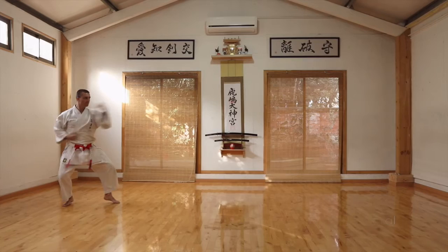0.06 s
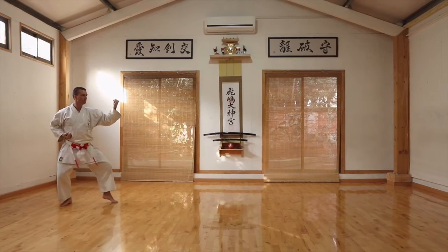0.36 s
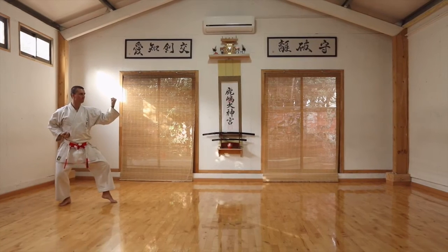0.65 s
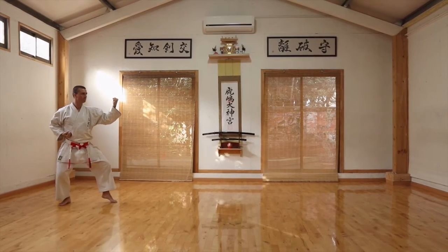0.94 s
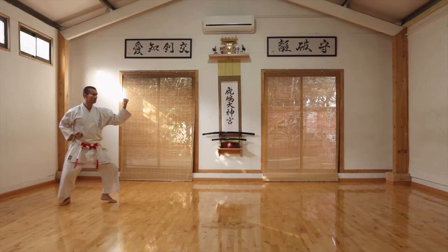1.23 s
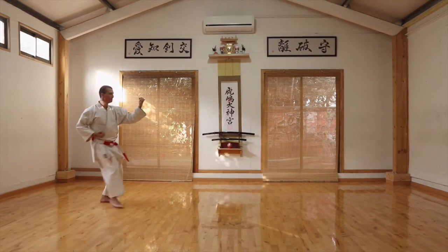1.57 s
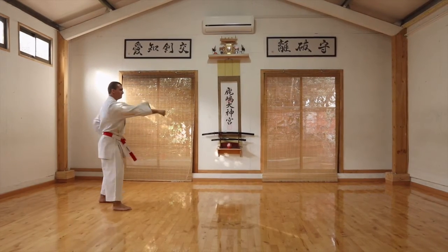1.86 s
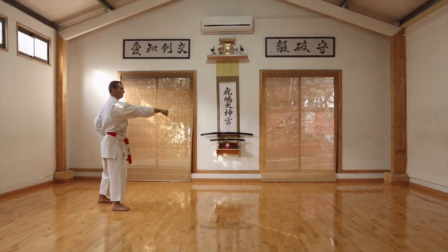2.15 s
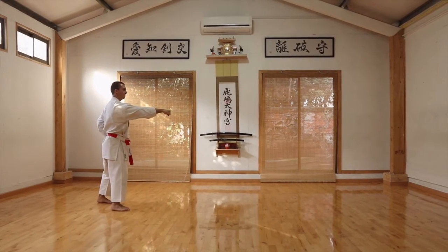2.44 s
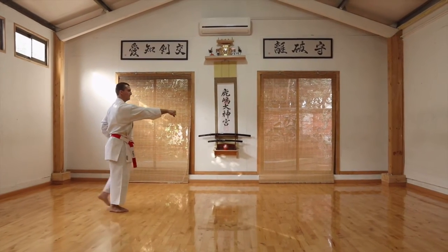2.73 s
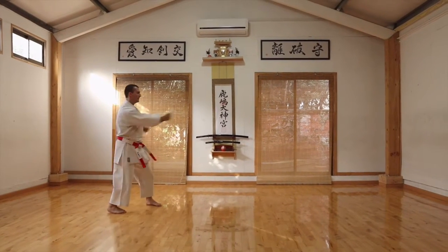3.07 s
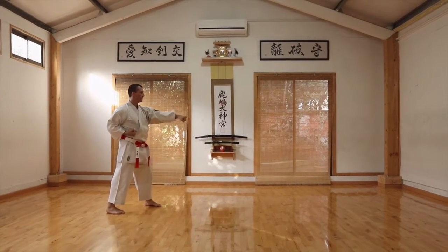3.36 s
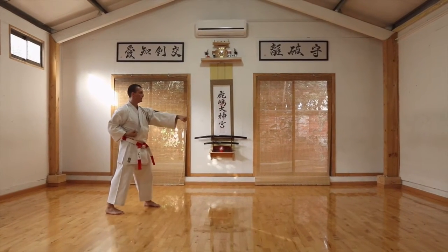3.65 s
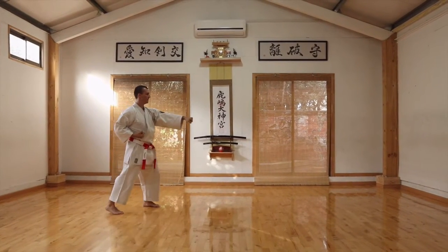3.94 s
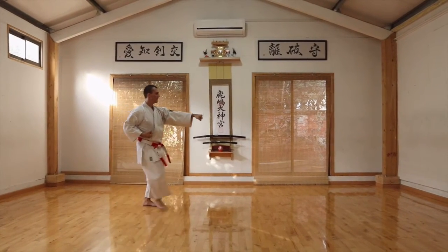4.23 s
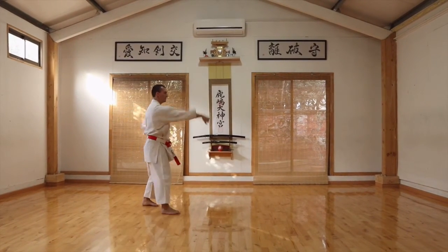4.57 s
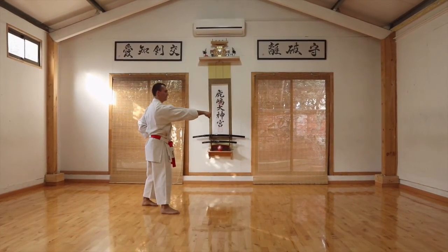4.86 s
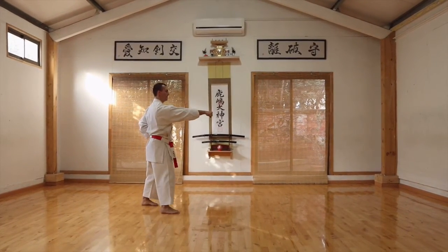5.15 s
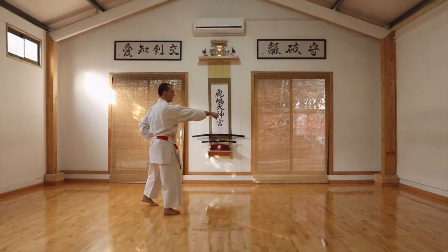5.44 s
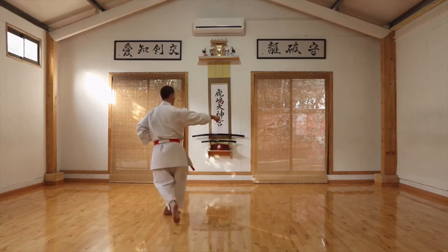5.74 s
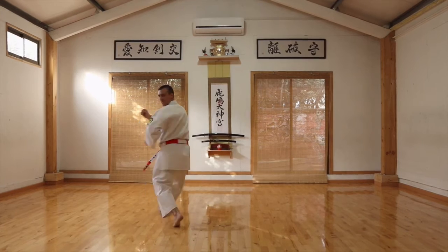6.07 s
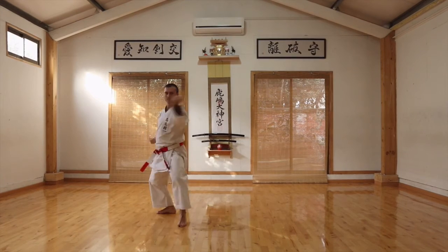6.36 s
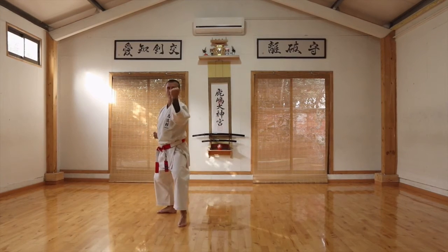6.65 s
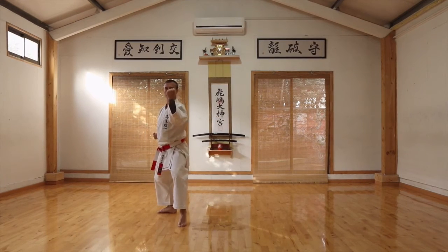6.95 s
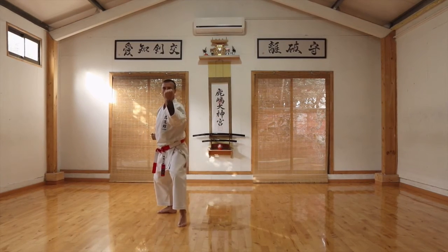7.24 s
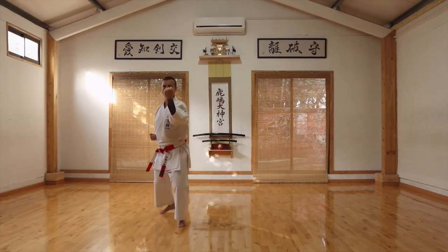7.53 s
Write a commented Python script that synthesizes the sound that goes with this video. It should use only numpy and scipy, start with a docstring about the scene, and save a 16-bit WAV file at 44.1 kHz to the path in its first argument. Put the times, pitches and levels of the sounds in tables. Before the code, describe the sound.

A barefoot karate practice is heard from a few metres away in an empty wooden hall, which rings for about a second over low room noise. It opens with a cotton rustle, faint squeaks and a cloth snap at 0.1 seconds. At 1.3 seconds a loud stamp booms in the sprung floor, followed by rustling and a sharp swish and crack of the heavy suit at 1.9. After a pause, fabric slides and soles chirp on the varnish from 2.6, leading to another crack at 3.2. More rustling and small squeaks from 4.0 end in a slightly softer snap at 4.6. Between 5.1 and 6.3 come light steps, short chirps and shifting cloth, then a strong crack at 6.4. The room is almost still until 7.5 seconds, when a second loud stamp lands with a squeak, a slap and a rustle.

```python
"""Empty wooden hall: a karateka runs through a form, barefoot, a few metres away.
His heavy cotton suit rustles as cloth slides over cloth and cracks taut at the end of each strike.
His soles stick and slip on the varnish in short chirps; two stamps boom in the sprung floor.
The hall rings for over a second above a low room noise."""
import sys
import numpy as np
from scipy import signal
from scipy.fft import rfft, irfft
from scipy.io import wavfile
from scipy.ndimage import uniform_filter1d

SR = 44100
rng = np.random.default_rng(int(sys.argv[2]) if len(sys.argv) > 2 else 0)


def dump_mix(stems):
    """Bounce the given channels to the path in sys.argv[1] as a 16-bit WAV at rate SR."""
    frames = np.atleast_2d(stems).T  # one column per channel
    limited = np.clip(frames, -1, 1)  # hard clip at full scale
    pcm = np.round(limited * 32767).astype(np.int16)
    wavfile.write(sys.argv[1], SR, pcm)


N = 335160
T = np.arange(N) / SR

# Levels are relative, ahead of the mix gains.
# spectral shapes of room noise, reflections, sole slap, sliding cloth, taut cloth: f/Hz, level/dB
ROOM_SPECTRUM = [(25, 9.5), (50, -5), (85, 2.5), (300, 2.5), (650, -9.5), (900, -8), (1900, -21.5),
                 (3300, -24.5), (5000, -28), (8000, -30), (15500, -31)]
HALL_SPECTRUM = [(60, -20.5), (150, -3.5), (450, 0.5), (1200, -5), (3500, -2), (8000, -3), (15000, -4)]
SLAP_SPECTRUM = [(60, -23), (450, -2), (900, 4), (1400, 7), (1800, -1.5), (3500, -5.5), (5000, -13.5),
                 (8000, -27), (15500, -34)]
RUSTLE_SPECTRUM = [(40, -26), (100, 6), (300, 7), (550, 0.5), (1000, 4.5), (2000, -2.5), (3500, -2.5),
                   (5000, -13), (8000, -20), (15500, -35.5)]
SNAP_SPECTRUM = [(40, -26), (100, -15.5), (200, -5), (400, -1), (620, -1), (900, -2), (1400, -0.5),
                 (2200, -14), (3400, -11.5), (5000, -21), (8000, -29), (15500, -41.5)]
# reverberation time: f/Hz, T60/s
HALL_DECAY = [(80, 0.71), (200, 0.93), (550, 1.27), (1400, 1.095), (3500, 0.83), (7000, 0.92),
              (14000, 0.28)]
# far-wall echoes: delay/s, level/dB
FAR_ECHOES = [(0.081, -16.5), (0.117, -21), (0.168, -11), (0.302, -24)]
# sprung-floor modes at pitch factor 1: f/Hz, level/dB, T60/s
FLOOR_MODES = [(65.8, -18, 0.99), (85.7, -9.5, 0.32), (125.4, -8.5, 0.56), (139.2, 2.5, 0.19),
               (191.2, -11, 0.61), (242.3, -14.5, 0.22), (289, -16.5, 0.15)]
# feet landing: t/s, thud/dB, slap/dB, pitch factor of the spot, hardness/(dB/oct)
LANDINGS = [(0.001, -28.5, -27.5, .8, 8), (1.329, -4, -15, 1.02, -1), (1.3452, -10.5, -38, 0.97, 3.5),
            (2.903, -32.5, -46, 1.53, 15), (3.091, -33, -34, 1.2, 0), (4.111, -33, -58, 0.88, 15.5),
            (5.119, -34, -26, 0.95, 7), (5.595, -30, -45, 1.05, 8), (5.818, -27, -41, 0.9, 2),
            (6.126, -33, -34.5, 1.36, 4), (6.285, -24, -29, 1.23, -5), (7.5184, -6.5, -14.5, .93, -3)]
# soles skidding: t/s, start f/Hz, length/s, level/dB
SOLE_SKIDS = [(0.039, 3245, 0.042, -27.5), (.068, 3650, .03, -32), (1.3266, 1260, 0.0092, -12.5),
              (2.681, 1430, .014, -26.5), (2.935, 1120, 0.0089, -23.5), (3.0636, 1375, 0.012, -15.5),
              (3.0774, 2190, 0.0051, -12.5), (3.083, 3500, 0.0058, -26), (4.404, 1151, 0.035, -24),
              (4.485, 1400, 0.0089, -23), (4.499, 2520, 0.0049, -19.5), (5.102, 1210, 0.0118, -26.5),
              (5.52, 1370, 0.0048, -26.5), (5.7457, 1316, 0.0079, -15.5), (5.898, 1120, 0.007, -25),
              (6.207, 1250, 0.006, -25), (7.001, 1290, 0.0057, -39), (7.009, 2220, 0.0096, -44),
              (7.307, 1200, 0.0404, -37.5), (7.513, 1165, 0.011, -9.5)]
# moves dragging cloth over cloth: t/s, length/s, level/dB, tilt/(dB/oct)
BODY_MOVES = [(0.0, 0.12, -28, 1.25), (.929, 0.027, -43.5, -1.2), (1.38, 0.12, -25, -1.3),
              (1.548, 0.023, -33, 3), (1.727, 0.065, -29, -0.3), (2.638, 0.03, -39.5, -2),
              (2.667, 0.087, -26.5, 1), (2.918, 0.06, -33, -1), (3.052, 0.07, -25, 0),
              (3.873, 0.096, -43.5, -1.5), (4.033, 0.053, -29, 0.1), (4.382, .16, -25.5, 0.4),
              (5.083, 0.093, -46.5, 4.5), (5.503, 0.078, -29, -.5), (5.719, 0.074, -27, 0),
              (5.862, 0.078, -31, 2.5), (5.97, 0.052, -41.5, 0), (6.192, 0.056, -31, -1),
              (6.264, 0.14, -28, 0), (6.99, 0.067, -50, 0.5), (7.278, 0.081, -40.5, -3.5),
              (7.4, 0.17, -49.5, 1), (7.519, 0.042, -20, -0.2)]
# folds pulled tight: t/s, level/dB, tilt/(dB/oct)
FOLD_TUGS = [(1.3247, -26.5, 7), (1.347, -20, 1), (1.553, -18.5, 0.5), (1.871, -11.5, -2), (2.95, -18, 0.5),
             (3.213, -18, -6), (3.914, -38.5, 6.5), (4.04, -23, -8.5), (5.523, -39, 11), (5.593, -29, -5),
             (6.337, -20, -5), (7.513, -23, 3.5), (7.53, -18, 0)]
# limb locking: t/s, swish/dB, crack/dB, crack f/Hz, hem/dB, flap/dB, flap f/Hz, flap decay/s
LIMB_STRIKES = [(0.0997, -39, -15.5, 825, -20, -22, 410, 0.046),
                (1.885, -21.5, -15, 585, -27, -15, 623, 0.023),
                (3.2245, -19.5, -13, 910, -25, -21.5, 590, 0.053),
                (4.6132, -29, -17.5, 503, -37, -17, 565, 0.041),
                (5.595, -46, -26, 400, -42, -20, 385, 0.014),
                (6.353, -27, -11, 550, -14.5, -23.5, 364, .03)]


def undb(db):
    """Decibels to gain."""
    return 10 ** (np.asarray(db) / 20)


def unit(x):
    """Scale to rms 1."""
    return x / np.sqrt(np.mean(x ** 2) + 1e-18)


def lookup(table, hz):
    """Read a table on a log-frequency axis."""
    table_hz, value = np.transpose(table)
    return np.interp(np.log(np.maximum(hz, 1)), np.log(table_hz), value)


def add(out, at_s, x):
    """Mix x into out."""
    i = max(int(at_s * SR), 0)
    out[i:i + len(x)] += x[:max(N - i, 0)]


def lag(x, tau_s):
    """One-pole smoothing."""
    pole = np.exp(-1 / (tau_s * SR))
    return signal.lfilter([1 - pole], [1, -pole], x)


def wander(rate_hz):
    """Random drift, spread near 1."""
    knots = rng.standard_normal(N // 10)
    return np.interp(T * rate_hz, np.arange(len(knots)), knots)


def colour(x, spectrum, tilt_db_oct=0, taps=2048):
    """Minimum-phase filter of unit energy with a tilted spectrum."""
    hz = np.maximum(np.fft.rfftfreq(taps, 1 / SR), 20)
    cepstrum = irfft(np.log(undb(lookup(spectrum, hz) + tilt_db_oct * np.log2(hz))))
    cepstrum[1:taps // 2] *= 2
    cepstrum[taps // 2 + 1:] = 0
    response = irfft(np.exp(rfft(cepstrum)))
    return signal.fftconvolve(x, response / np.linalg.norm(response))[:len(x)]


def impulses(n, rate_hz, spread_db):
    """Random clicks at rms 1, a few much larger than the rest."""
    sizes = undb(spread_db * np.minimum(rng.exponential(size=n), 4))
    return unit((rng.random(n) < rate_hz / SR) * sizes * rng.choice([-1, 1], n))


def burst(spectrum, decay_s, tilt_db_oct=0, n=8192):
    """Coloured noise decaying from about rms 1."""
    x = colour(rng.standard_normal(n) * np.exp(-T[:n] / decay_s), spectrum, tilt_db_oct)
    return x / np.linalg.norm(x) * np.sqrt(decay_s * SR / 2)


def room_noise(level_db=-44.0, waver_db=2.8):
    """Low, slowly wavering rush with a thin hiss."""
    gain = undb(level_db - waver_db * wander(rate_hz=1.555))
    return gain * colour(rng.standard_normal(N), ROOM_SPECTRUM)


def hall_reverb(x, build_s=0.019):
    """Energy builds between the walls and drains, band by band; countless paths blur it to noise."""
    edges_hz = np.geomspace(58, 16000, 25)
    out = np.zeros(N)
    for low_hz, high_hz in zip(edges_hz, edges_hz[1:]):
        band = signal.butter(3, [low_hz, high_hz], "band", fs=SR, output="sos")
        hz = np.sqrt(low_hz * high_hz)
        t60_s = lookup(HALL_DECAY, hz)
        power = signal.sosfilt(band, x + 1e-9 * rng.standard_normal(N)) ** 2
        stored = t60_s * lag(lag(power, build_s), t60_s / (2 * np.log(1000)))
        noise = unit(signal.sosfilt(band, rng.standard_normal(N)))
        out += undb(lookup(HALL_SPECTRUM, hz)) * np.sqrt(stored) * noise
    return out


def near_walls(x, first_s=0.012, decay_s=0.13):
    """A constant pattern of early reflections gives the hollow colour."""
    t = T[:SR // 2]
    paths = impulses(len(t), rate_hz=1500, spread_db=4) * (t > first_s) * np.exp(-t / decay_s)
    paths = colour(paths, HALL_SPECTRUM)
    return signal.fftconvolve(x, paths / np.linalg.norm(paths))[:N]


def sole_chirps(grip_hz=1350, glide_oct=-0.77, scatter_oct=0.41):
    """Skin sticks and slips on varnish; pitch falls as the foot slows."""
    out = np.zeros(N)
    for at_s, start_hz, length_s, db in SOLE_SKIDS:
        progress = np.linspace(0, 1, int(length_s * SR))
        jitter = unit(uniform_filter1d(rng.standard_normal(SR // 10), size=12))[:len(progress)]
        slack = min(grip_hz / start_hz, 1) ** 1.8  # tight grip steadies the high squeaks
        hz = start_hz * 2 ** (glide_oct * slack ** 2 * progress + scatter_oct * slack * jitter)
        tone = np.sqrt(2) * np.sin(2 * np.pi * np.cumsum(hz) / SR)
        add(out, at_s, undb(db) * np.sin(np.pi * progress) * tone)
    return out


def footfalls(push_s=0.0024, slap_s=0.016, radiate_hz=66):
    """Body weight rings the boards, a hard heel favouring high modes; the sole slaps the varnish."""
    thuds, slaps = np.zeros(N), np.zeros(N)
    t = T[:SR // 2]
    push = 1 - np.exp(-t / push_s)
    pivot_hz = FLOOR_MODES[2][0]
    for at_s, thud_db, slap_db, pitch_factor, hardness_db_oct in LANDINGS:
        for hz, db, t60_s in FLOOR_MODES:
            gain = undb(thud_db + db + hardness_db_oct * np.log2(hz / pivot_hz))
            ring = np.exp(-np.log(1000) * t / t60_s) * np.sin(2 * np.pi * hz * pitch_factor * t)
            add(thuds, at_s, gain * ring * push)
        add(slaps, at_s, undb(slap_db) * burst(SLAP_SPECTRUM, slap_s))
    # boards much smaller than the wavelength radiate poorly
    radiation = signal.butter(2, radiate_hz, "high", fs=SR, output="sos")
    return signal.sosfilt(radiation, thuds), slaps


def cloth_rustle(rise_share=0.31, fade_s=0.021, settle_s=0.14, flutter_db=2.5):
    """Sliding fabric buckles in tiny clicks; folds catch and slip; level follows speed."""
    creases = impulses(N, rate_hz=5000, spread_db=2.5)
    grain = unit(creases * undb(flutter_db * wander(rate_hz=91)))
    out, t = np.zeros(N), T[:SR * 3 // 4]

    def slide(at_s, speed, db, tilt_db_oct):
        """Cloth slides over cloth."""
        piece = grain[int(at_s * SR):][:len(t)]
        add(out, at_s, undb(db) * colour(piece * speed[:len(piece)], RUSTLE_SPECTRUM, tilt_db_oct))

    def swing(stop_s, db, grow_s, tilt_db_oct):
        """A limb accelerates, then stops dead."""
        start_s = max(stop_s - t[-1] / 2, 0)
        late_s = start_s + t - stop_s
        slide(start_s, np.exp(np.minimum(late_s / grow_s, -late_s / fade_s)), db, tilt_db_oct)

    for at_s, length_s, db, tilt_db_oct in BODY_MOVES:
        rise = np.minimum(t / (rise_share * length_s), 1) ** 1.2
        fall = np.exp(-np.maximum(t - length_s, 0) / fade_s)
        slide(at_s, rise * fall, db, tilt_db_oct)
        settle = np.minimum(t / fade_s, 1) * np.exp(-t / settle_s)
        slide(at_s + length_s, settle, db - 7.5, tilt_db_oct - 1.5)  # loose cloth swings on
    for at_s, swish_db, *_ in LIMB_STRIKES:
        swing(at_s, swish_db, grow_s=0.02, tilt_db_oct=-0.41)
    for at_s, thud_db, *_ in LANDINGS:
        swing(at_s, thud_db - 30.5, grow_s=0.045, tilt_db_oct=-3)  # trouser leg
    return out


def snap(panel_hz, decay_s, tilt_db_oct, panel_db=2.5, width_oct=0.61):
    """A cloth panel whips taut and pops at a broad pitch."""
    hz = np.geomspace(40, 16000, 100)
    peak_db = panel_db * np.exp(-(np.log2(hz / panel_hz) / width_oct) ** 2)
    return burst(np.c_[hz, lookup(SNAP_SPECTRUM, hz) + peak_db], decay_s, tilt_db_oct)


def cloth_cracks(jacket_db=-27):
    """Sleeve or trouser leg cracks and flaps, the hem ticks, the jacket whumps; tugged folds pop once."""
    out = np.zeros(N)
    for at_s, _, crack_db, crack_hz, hem_db, flap_db, flap_hz, flap_s in LIMB_STRIKES:
        crack = snap(crack_hz, decay_s=0.0048, tilt_db_oct=1, panel_db=5.5)
        flap = snap(flap_hz, flap_s, tilt_db_oct=-1.3, panel_db=6)
        hem = snap(panel_hz=2400, decay_s=0.0014, tilt_db_oct=3.7)
        jacket = snap(panel_hz=260, decay_s=0.022, tilt_db_oct=-2.5)
        add(out, at_s, undb(crack_db) * crack)
        add(out, at_s + 0.005, undb(flap_db) * flap)
        add(out, at_s + 0.009, undb(hem_db) * hem)
        add(out, at_s + 0.016, undb(jacket_db) * jacket)
    for at_s, db, tilt_db_oct in FOLD_TUGS:
        add(out, at_s, undb(db) * snap(panel_hz=790, decay_s=0.0016, tilt_db_oct=tilt_db_oct))
    return out


def scene(whump_db=-2, whump_hz=450):
    """Mono mix: direct sound, far-wall echoes of booms and whumps, near walls, reverb, room noise."""
    rustle, cracks, chirps = cloth_rustle(), cloth_cracks(), sole_chirps()
    thuds, slaps = footfalls()
    out = undb(-3.5) * rustle + undb(0.5) * cracks + undb(-3.0) * chirps + undb(-5.0) * slaps + thuds
    whumps = undb(whump_db) * signal.lfilter(*signal.iirpeak(whump_hz, 2, fs=SR), cracks)
    for delay_s, db in FAR_ECHOES:
        add(out, delay_s, undb(db) * (thuds + whumps))
    send = undb(-0.42) * rustle + undb(3.0) * cracks + undb(-9.5) * chirps + undb(1.0) * slaps
    out += undb(-14.0) * near_walls(send)
    out += hall_reverb(send + undb(-0.5) * thuds)
    return (out + room_noise())[None]


def record(dry, presence_hz=3420, width_hz=600, low_cut_hz=56, high_cut_hz=15750):
    """Microphone chain: 6 dB presence peak, bass cut, soft clip on the stamps, top cut."""
    presence = signal.iirpeak(presence_hz, presence_hz / width_hz, fs=SR)
    bright = dry + signal.lfilter(*presence, dry)
    lean = signal.sosfilt(signal.butter(4, low_cut_hz, "high", fs=SR, output="sos"), bright)
    rounded = lean / (1 + lean ** 8) ** (1 / 8)
    return signal.sosfilt(signal.ellip(12, 0.1, 80, high_cut_hz, fs=SR, output="sos"), rounded)


dry = scene()
out = record(dry)
dump_mix(out)
```